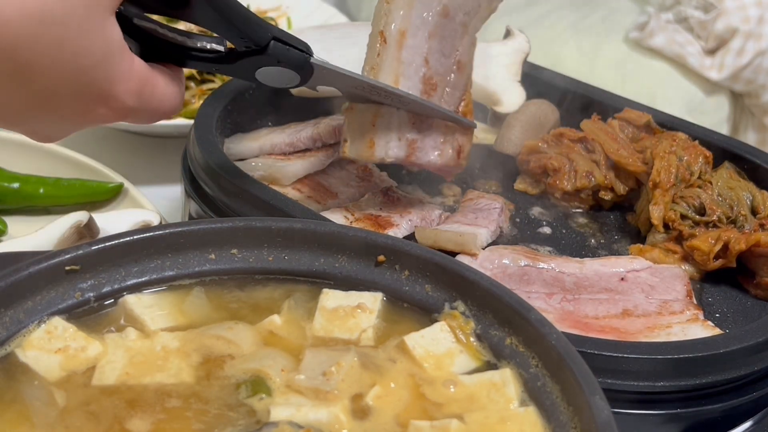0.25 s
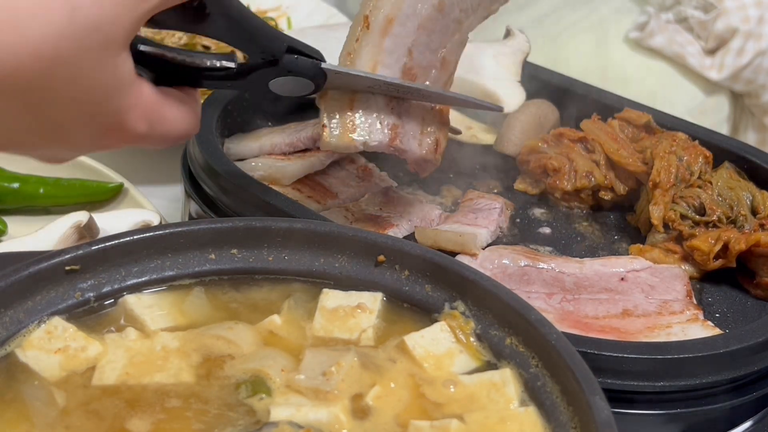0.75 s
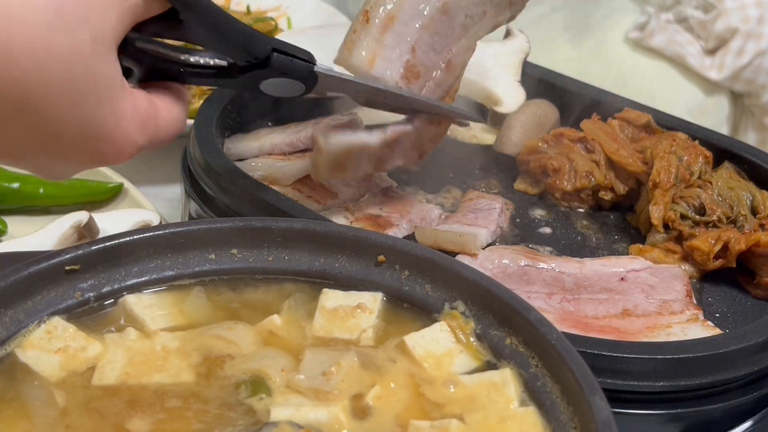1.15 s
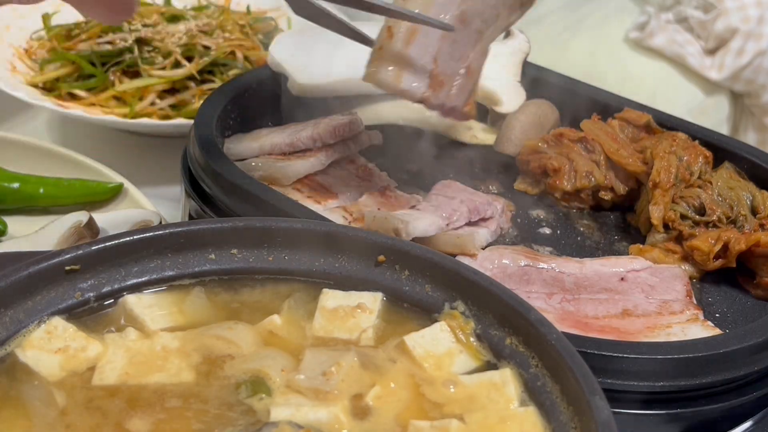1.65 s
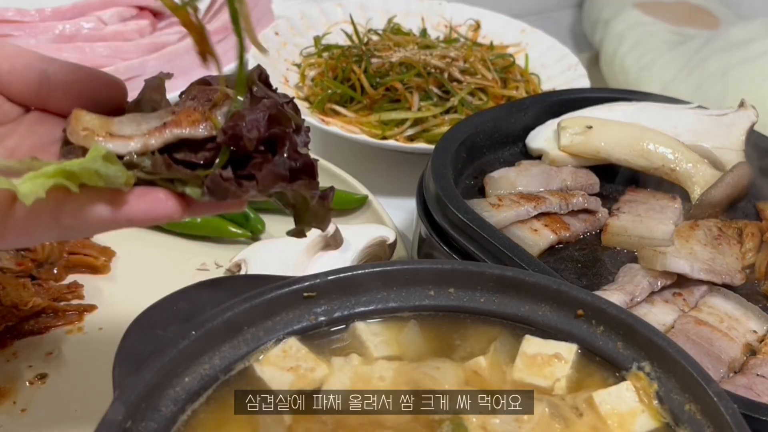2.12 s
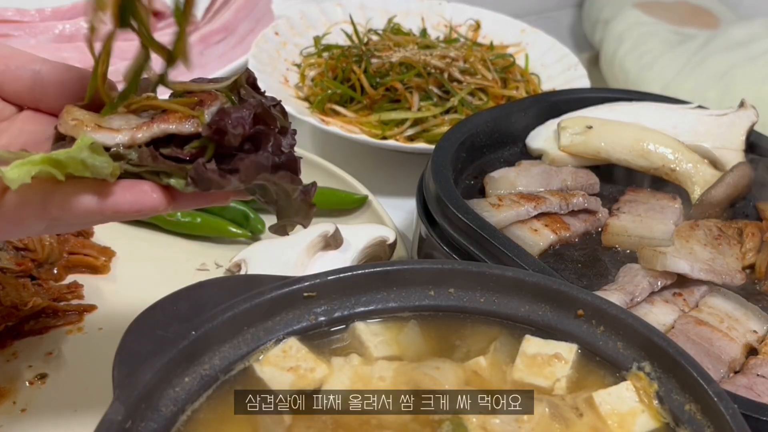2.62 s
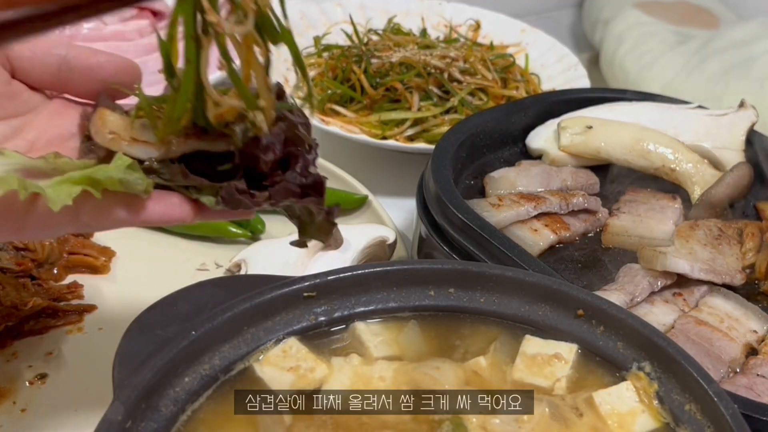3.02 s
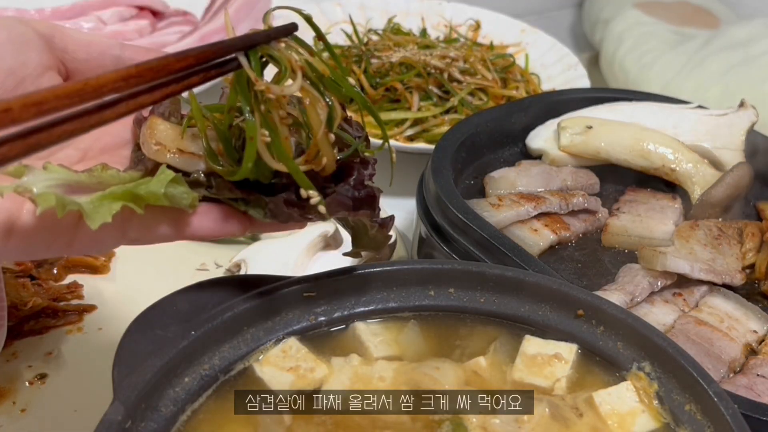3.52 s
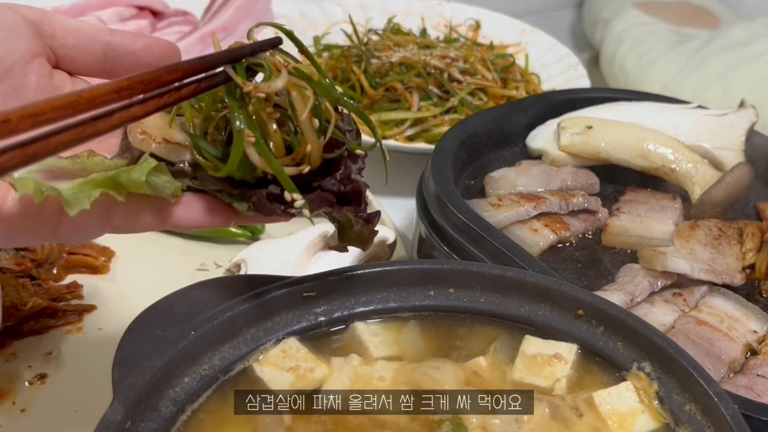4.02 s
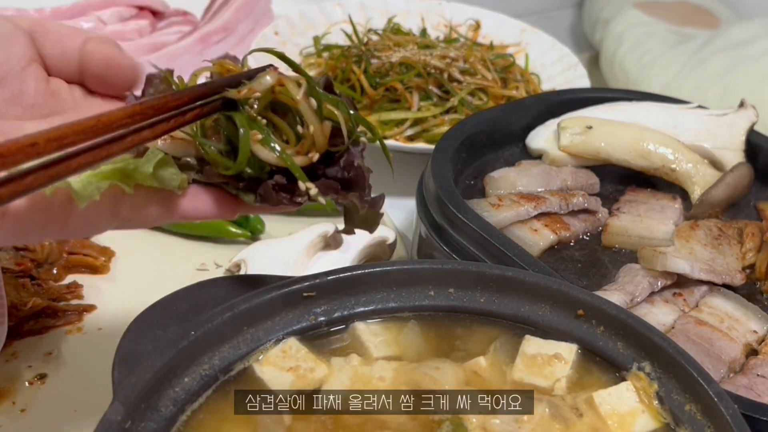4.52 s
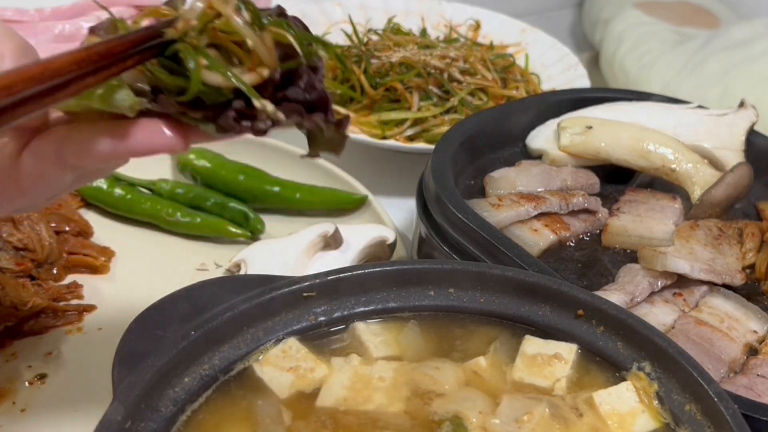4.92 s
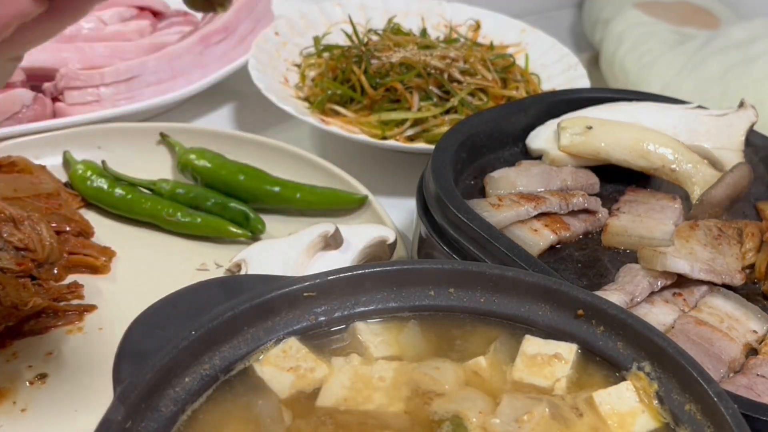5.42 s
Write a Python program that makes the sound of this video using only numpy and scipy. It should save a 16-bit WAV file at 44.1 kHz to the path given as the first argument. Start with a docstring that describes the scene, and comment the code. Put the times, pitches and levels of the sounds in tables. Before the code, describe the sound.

Pork belly sizzles close by on a tabletop grill pan, a dense bright crackle with sharp spits of fat. Scissors knock dully against the pan a few times. After almost two seconds the sizzle suddenly becomes quieter and more distant, and keeps crackling and popping with faint chopstick taps on dishes. A soft household hum and a few muffled footstep thuds lie underneath.

```python
"""At a table with a hot grill pan, pork fat sizzles, first close by and then suddenly further off.
Tiny steam bubbles burst in a dense crackle, with louder spits that pop and ring on top.
Scissors and chopsticks knock dully on the pan and dishes. The house hums softly underneath,
and soft steps thud through the floor and table."""
import sys
import numpy as np
from scipy import signal
from scipy.fft import rfft, irfft
from scipy.io import wavfile
from scipy.ndimage import uniform_filter1d

SR = 44100
rng = np.random.default_rng(int(sys.argv[2]) if len(sys.argv) > 2 else 0)


def to_wav(s):
    """Save 16-bit WAV."""
    ch = np.atleast_2d(s).T  # columns
    pcm = np.round(np.clip(ch, -1, 1) * 32767)  # PCM
    wavfile.write(sys.argv[1], SR, pcm.astype(np.int16))


N = 249606
TIME, FREQS = np.arange(N) / SR, np.fft.rfftfreq(N, 1 / SR)
FAR_FROM_S = 1.769  # when the sound jumps from close by to further off
LEFT_RIGHT = np.array([[1], [-1]])  # adds on the left, subtracts on the right


def undb(db):
    """Turn decibels into a number to multiply by."""
    return 10 ** (np.asarray(db) / 20)


def wander(per_s):
    """A smooth random wobble around zero, roughly 1 in size."""
    hold = int(SR / per_s)
    levels = np.repeat(rng.standard_normal(N // hold + 1), hold)
    return 2.8 * uniform_filter1d(uniform_filter1d(levels, hold), hold)[:N]


def unit_burst(sound):
    """Give a short sound the same energy as 2 ms (88 samples) at level 1."""
    return sound / np.sqrt(np.sum(sound ** 2, axis=-1, keepdims=True) / 88)


def colour(noise, table):
    """Make each pitch in a white noise as strong as the table says."""
    hz, db = np.transpose(table)
    gain = undb(np.interp(np.log(FREQS + 1), np.log(hz), db)) * np.sqrt(SR / 2)
    return irfft(rfft(noise) * gain, N)


def steam_bubbles(per_s, spread_db, most_db, hiss, tail_s, width_octaves, flicker_db, smooth_below_hz):
    """Each bursting bubble lets out a flash of noise around its own pitch, over a steady hiss."""
    when, size, pitch = rng.random((int(per_s * N / SR), 3)).T
    size = undb(most_db * np.tanh(-spread_db * np.log(1 - size) / most_db))  # many small, few large
    pitch = np.log2(900) + 4.3 * pitch  # up to 4.3 octaves above 900 Hz
    noise = rfft(rng.standard_normal((2, N)))
    octave = np.log2(FREQS + 1)
    flicker = undb(2 * flicker_db * (wander(30) + 0.11 * wander(57)))
    out = 0
    for centre in np.arange(7, 14.6, .5):  # half-octave bands from 128 Hz up
        band = np.cos(np.pi * np.clip(octave - centre, -.5, .5)) ** 2
        if centre == 7:  # the lowest band also takes all the bass below it
            band[octave < centre] = 1
        energy = size ** 2 * np.exp(-((pitch - centre) / width_octaves) ** 2)
        bursts = np.bincount((when * N).astype(int), energy, N)
        fade_s = tail_s * 2 ** (0.43 * (12 - centre))  # tail_s at 4096 Hz, longer lower down
        bursts = signal.lfilter([1], [1, -np.exp(-1 / (fade_s * SR))], bursts)
        # small bubbles put little into the bass, which stays a smooth hiss
        grain = (1 - hiss) / (1 + (smooth_below_hz / 2 ** centre) ** 2)
        power = 1 - grain + grain * bursts / bursts.mean() * flicker
        out = out + irfft(noise * band, N) * np.sqrt(power / power.mean())
    return out


# The tone of the sizzle, close by and further off. Each row: pitch in Hz, level in dB per Hz.
NEAR_TONE = [(150, -82.5), (500, -83), (1000, -78.5), (1550, -76.5), (1750, -70.5), (2500, -73.5),
             (3100, -69), (3800, -73), (5000, -71), (6500, -72.5), (10000, -69.5), (13000, -73.5),
             (15000, -67.5)]
FAR_TONE = [(150, -87.5), (550, -91.5), (800, -86.5), (1100, -88.5), (1500, -81), (1900, -85),
            (2900, -87.5), (3800, -85), (4600, -82.5), (5300, -85), (6300, -83.5), (11300, -86),
            (13000, -89), (15000, -85.5)]
# How hard the fat fries. Each row: time in seconds, change of level in dB.
NEAR_SWELL = [(0, 0.5), (.4, -1.76), (.7, 0.5), (1.0, -2), (1.3, 0.5), (1.55, 0.4), (1.75, -0.5)]
FAR_SWELL = [(1.8, -0.97), (2.1, -0.79), (2.4, -1.4), (2.6, -0.68), (2.8, -0.46), (3.05, -1.3), (3.3, -1.8),
             (3.55, -0.98), (3.8, -2.4), (4.05, -0.71), (4.3, -0.65), (4.45, -0.79), (4.65, -1.7),
             (4.85, -1.4), (5.0, -1.1), (5.25, -0.91), (5.34, -1.2), (5.6, -1)]


def sizzle():
    """The crackle of bubbles swells and sinks as the fat fries. Returns the near and the far sound."""
    near = steam_bubbles(per_s=1300, spread_db=5.6, most_db=23.4, hiss=0.72, tail_s=0.0007,
                         width_octaves=1.2, flicker_db=0.67, smooth_below_hz=730)
    far = steam_bubbles(per_s=650, spread_db=3.7, most_db=15.5, hiss=0.56, tail_s=0.00084,
                        width_octaves=0.41, flicker_db=1.0, smooth_below_hz=1070)
    near *= undb(np.interp(TIME, *np.transpose(NEAR_SWELL)))
    far *= undb(np.interp(TIME, *np.transpose(FAR_SWELL)))
    return colour(near, NEAR_TONE), colour(far, FAR_TONE)


# The tone of the house's hum. Each row: pitch in Hz, level in dB per Hz before any boost.
HUM_TONE = [(20, -112), (38, -112), (55, -91), (85, -81), (130, -94), (220, -100), (500, -140)]


def house_hum(boost_db):
    """The house hums softly: a deep noise that is nearly the same on both sides."""
    middle, side = colour(rng.standard_normal((2, N)), HUM_TONE) * undb(0.23 * wander(6.4))
    return undb(boost_db) * (middle + undb(-12.5) * side * LEFT_RIGHT)


def small_spit_rows(per_s=16):
    """Small spits fall at random, softer from further off. The rows are laid out like LOUD_SPITS."""
    count = int(per_s * N / SR)
    when, pitch, length = rng.random((count, 3)).T
    tilt, tick = rng.standard_normal((count, 4)).T[1:3]
    start_s = when * N / SR
    body_db = np.where(start_s < FAR_FROM_S, -52.5, -67)
    ring_hz, rise_cycles = 1615 * 2 ** (2.1 * pitch), 2.36 * (.5 + length)
    return np.transpose([start_s, body_db, 7 + 3 * tilt, body_db + 17 - tick,
                         ring_hz, body_db + 7, rise_cycles])


# Loud spits of fat. Each row: start in seconds, level of the pop's body in dB, its tilt towards the
# treble in dB per octave, tick level in dB, ring pitch in Hz, ring level in dB, ring rise in cycles.
LOUD_SPITS = [(0.0465, -49.1, 3.1, -21, 6840, -33, 1.8), (0.0727, -35, 5, -30, 3900, -27, 1.5),
              (0.1027, -41, -6, -36, 3390.0, -40, 1.1), (0.108, -50, 9.8, -35, 4600, -23, 3.6),
              (0.1252, -43, 5, -36, 4010.0, -42.2, 3.8), (0.1809, -34.5, -5, -44.4, 2820, -23, 1.6),
              (0.2243, -32.5, -2, -25.5, 2000, -29, 1.2), (0.2354, -44.7, 11.3, -45.6, 4230, -23, 1.1),
              (0.2548, -39, -6.5, -45.7, 2870.0, -27, 1.5), (0.334, -39, -2.0, -24.5, 3850.0, -52.0, 4.4),
              (0.3414, -32.5, -3.5, -35.0, 4360.0, -31, 2.4), (0.3567, -32.5, -6, -36.2, 2400, -13.5, 0.46),
              (0.3703, -28.5, -2, -38, 5140.0, -31, 1.2), (0.3902, -38, 4.4, -30, 5590.0, -38.2, 1.7),
              (0.4665, -22, -1, -20, 5360, -21, 1.4), (0.5377, -49.7, 2.5, -45.3, 3370, -25, 1.9),
              (0.5581, -41, -6, -25, 2600, -28, 1.9), (0.5955, -31.5, -3, -25, 1900.0, -31, 1.9),
              (0.6593, -44, 2, -44.7, 5140.0, -21, 1.7), (0.6694, -34, -1, -34.2, 3120.0, -31.5, 2.3),
              (0.6972, -29, -8, -26, 2610, -20, 1.7), (0.7516, -43, 3.0, -35, 2240.0, -38.3, 1.1),
              (0.7744, -37, 2.1, -42, 3870, -32, 1.0), (0.7819, -33, 4.2, -40, 2060.0, -25, 0.89),
              (0.8317, -34, 1, -30.0, 2150.0, -37.5, 1.7), (0.8891, -36, 7, -23, 5550, -25, 2.4),
              (0.8946, -31, 3, -37, 5140.0, -28, 2.4), (0.9374, -31, -5, -36, 5590.0, -27, 2.0),
              (0.9434, -48.7, 2.1, -24, 1200.0, -49, 1.3), (1.0233, -26, -4.5, -41, 3000, -18, 0.72),
              (1.0458, -42, -8, -45.9, 1900.0, -24, 1.9), (1.0571, -42.5, -8, -45.9, 1820, -29, 2.5),
              (1.0824, -30, -4, -37, 5360.0, -17, 1.2), (1.1271, -32.5, 0, -38.4, 3100, -27, 4),
              (1.1529, -33.5, -5, -30, 1980.0, -38, 1.7), (1.2336, -33, -1, -43.3, 6080.0, -24, 1.9),
              (1.2887, -28, 5, -27, 4800, -32, 1.8), (1.3032, -31, -2, -36, 3140, -25, 2.8),
              (1.3419, -38, -3, -33.4, 5140.0, -26, 1.3), (1.3624, -48, -4, -36.5, 2870.0, -18.5, 1.0),
              (1.4116, -44, 4, -34, 3390.0, -28, 1.4), (1.4261, -36, -3, -28.4, 3360, -22, 1.4),
              (1.4677, -29.5, 8, -27, 6330.0, -32.1, 1.0), (1.4784, -38, 6, -23, 4730.0, -22, 1.2),
              (1.4929, -39, 9, -33.9, 2670, -22, 1.1), (1.5315, -38, -4, -31, 3050, -28, 2.8),
              (1.5349, -29.5, -6, -23, 5250, -27, 3.9), (1.5753, -32, -1, -35, 4180.0, -32.0, 1.3),
              (1.5951, -49, -3, -44.0, 1980.0, -45, 1.7), (1.6496, -38, 6, -37.4, 3260.0, -27, 1.5),
              (1.6788, -39, 1.5, -44.3, 3390.0, -34.0, 1.5), (1.6868, -30.5, 2, -40, 2060.0, -32.1, 1.6),
              (1.712, -36, 12, -43.7, 2640.0, -43.0, 2.8), (1.8156, -45, 3.4, -43.1, 3850.0, -50.4, 2.4),
              (1.8844, -49, 3, -50, 5200, -41, 1.5), (1.9972, -47, -2, -47, 5360.0, -41.1, 1.2),
              (2.0294, -60, -2, -47.9, 6080.0, -34.9, 1.6), (2.0444, -53, 13, -44.2, 6080.0, -35.4, 1.8),
              (2.0944, -43, -7, -55, 2000, -49, 1.0), (2.0859, -40.5, 1, -34, 7000, -20, 1.6),
              (2.108, -43, 3, -40, 7180.0, -36.9, 1.8), (2.1828, -43, 12, -40, 1890, -34, 0.99),
              (2.1948, -40, 5, -32, 4570, -25, 2.6), (2.2772, -51, 9, -43, 6400, -23.5, 2.3),
              (2.394, -46.6, 2, -52, 1900.0, -43.3, 1.1), (2.4188, -46, 4, -45, 3260.0, -44.6, 1.4),
              (2.464, -59, 4, -34.5, 7180.0, -35, 1.3), (2.5385, -49, 2, -40, 3690.0, -36, 1.1),
              (2.5443, -48, 3.5, -39, 6080.0, -27, 2.2), (2.5612, -47, 9, -41, 6640, -24, 1.2),
              (2.584, -56, 3.1, -61.0, 3600, -40.3, 2.4), (2.6023, -54, 7.4, -58.8, 4630, -31, 3.3),
              (2.6276, -50, 13, -37.5, 5360.0, -32, 1.7), (2.6366, -56, 7, -36, 2640.0, -54.7, 1.2),
              (2.6543, -60.3, 7.8, -44, 6600.0, -27, 2.7), (2.6965, -55, 1.5, -37, 7180.0, -29, 1.7),
              (2.7391, -55, 6, -52.4, 4870, -32, 2.4), (2.8271, -43, -8, -35.5, 1900.0, -56, 1.1),
              (2.8606, -51, -13, -55, 2500, -45, 1.1), (2.8737, -54, 1, -37.4, 7180.0, -38, 2.7),
              (2.8847, -53, -5, -40, 2150.0, -44.7, 1.2), (2.8921, -59, 10, -56.1, 6600.0, -32, 1.7),
              (2.953, -42, -1, -34, 1820.0, -44.1, 1.0), (3.031, -42, 0, -51, 4360.0, -52.6, 4.2),
              (3.0393, -46, -11, -61.4, 2640.0, -52.0, 1.7), (3.0615, -47, 7.7, -48, 5590.0, -48.1, 2.0),
              (3.0953, -43, 9, -57, 2820, -44, 1.2), (3.1048, -47, 12.5, -55, 4010.0, -43.0, 1.4),
              (3.1534, -52, 12.0, -50, 4540.0, -38, 1.3), (3.1607, -43, 3, -56.6, 6250, -29, 2),
              (3.2673, -52, 8, -47, 7180.0, -30, 1.3), (3.4405, -42.5, 2, -54, 2870.0, -46, 1.4),
              (3.4624, -52.6, 7.0, -40, 6600.0, -34, 2.5), (3.4964, -40, 7, -36, 7300, -23, 1.7),
              (3.5133, -37.5, 5, -55.7, 6040, -28, 2.3), (3.5823, -41.5, 5, -34, 1820.0, -38, 1.4),
              (3.6052, -48, 1, -37, 6880.0, -34.2, 1.8), (3.6413, -50, -8, -44.9, 7180.0, -42, 1.3),
              (3.6704, -56.7, -4.7, -40, 6600.0, -45, 1.7), (3.7225, -52.6, -2, -45, 6880.0, -39, 1.8),
              (3.7516, -46, -5, -53, 4010.0, -40, 1.0), (3.786, -49, 1.8, -53.6, 5600, -34, 5.1),
              (3.8317, -54, 2.3, -63.1, 5360.0, -44, 3.1), (3.8831, -47.5, 14, -62.2, 1980.0, -42, 2.5),
              (3.9158, -55, 4.7, -45.3, 6500, -27, 3.3), (3.9203, -40, -4, -42, 7400, -16, 1.05),
              (3.9695, -52, 4, -43.0, 2060.0, -39, 1.7), (3.9805, -58, 4.8, -44, 4930.0, -35, 3.3),
              (4.0336, -58.7, 11.7, -40, 7180.0, -32, 1.4), (4.0451, -49, 5.4, -36, 3690.0, -41, 4.5),
              (4.0635, -42, 1, -52.0, 3850.0, -36, 3.5), (4.0807, -41, 0, -39, 2330.0, -52.6, 1.2),
              (4.1373, -56, 18, -36, 3120.0, -49, 3.0), (4.1943, -49, 0, -37, 2870.0, -59.9, 3.0),
              (4.2155, -52, 5.2, -42, 7180.0, -46, 3.3), (4.2353, -41, 4, -61.2, 4540.0, -42, 4.3),
              (4.2581, -42, 7, -42.4, 6500, -26, 1.7), (4.2735, -52, 12, -44.9, 3020, -34, 1.4),
              (4.2954, -39, 4, -37, 3540.0, -41.9, 1.6), (4.3621, -50, -3, -60.1, 1360.0, -34, 1.2),
              (4.3702, -57, 12.0, -34, 6270, -28, 2.1), (4.4007, -45, 4, -35.5, 2060.0, -35, 1.1),
              (4.4607, -52, 3.8, -53, 5550, -27, 2.2), (4.4788, -41, -2, -47, 3690.0, -45, 2.2),
              (4.5569, -46.4, 10, -36, 5860, -39, 2.0), (4.5989, -45, 3, -37, 4540.0, -34, 1.1),
              (4.6739, -52, -2, -49, 4730.0, -44, 1.6), (4.7118, -38, -2, -31, 7000, -30, 1.2),
              (4.719, -52.7, 7.3, -40, 1820.0, -47, 1.6), (4.7521, -50, 7.2, -39.5, 4930.0, -39, 2.4),
              (4.7778, -45.4, 0.8, -39, 6880.0, -34, 1.0), (4.8048, -42, 3, -59.1, 2540.0, -49.2, 1.3),
              (4.8137, -44, 2.5, -34.5, 6330.0, -36, 1.1), (4.9066, -56, 5, -39, 5830.0, -36.2, 1.5),
              (4.933, -42, 6, -39, 3690.0, -26, 1.1), (4.9393, -53, 6.2, -60.7, 6080.0, -26, 2.7),
              (4.9713, -44, 1, -36, 2150.0, -33, 0.89), (5.0701, -47, 4.6, -59.4, 4730.0, -32, 2.8),
              (5.0988, -41.5, 0, -36, 6880.0, -27, 1.3), (5.1325, -42, 3, -33, 6600.0, -27, 1.3),
              (5.173, -41, -4, -36, 2430.0, -47, 1.4), (5.2208, -56, 10, -41, 6400, -30, 2.9),
              (5.2528, -58, -3, -49, 4930.0, -43.4, 4.2), (5.2658, -52, 3.4, -48.6, 5440, -24.5, 2.7),
              (5.2783, -41, -1, -42, 6330.0, -41, 2.4), (5.2922, -47, 11, -53.5, 4200, -32, 1.5),
              (5.3887, -62, 9.2, -46, 5330, -26, 1.7), (5.4071, -60, 12.0, -51.4, 5590.0, -32, 2.4),
              (5.4233, -50, -5, -43, 1700, -35, 1.1), (5.4298, -50, -7.0, -61.5, 1890, -37, 1.1),
              (5.4672, -58.6, 12.0, -39.9, 7180.0, -33.7, 1.3), (5.4874, -40.5, 5, -38, 4540.0, -42, 1.6),
              (5.549, -44, 6, -49.2, 4900, -23, 1.4), (5.5802, -51.3, 7.5, -48.0, 4700, -30, 1.8),
              (5.5867, -43, 4, -54.3, 4400, -36.2, 1.7), (5.6054, -43, -3, -53.5, 2730, -39, 1.4),
              (5.6294, -45, 3, -40, 1750, -36, 0.86), (5.6434, -43, -1, -52, 5230, -38, 1.3)]
# Droplets too small to have a body or a ring. Each row: start in seconds, tick level in dB.
DROPLET_TICKS = [(1.9112, -47), (1.9166, -47), (2.0206, -43), (2.0964, -41), (2.1248, -40), (2.2565, -39),
                 (2.2853, -42), (2.6672, -44), (2.7195, -44), (2.7486, -48), (2.8209, -43), (2.9755, -43),
                 (2.9944, -44), (3.0162, -46), (3.4894, -41), (3.5165, -40), (3.5514, -43), (3.562, -40),
                 (3.6133, -39), (4.0601, -40), (4.3161, -43), (4.3307, -45), (4.3357, -43), (4.5157, -44),
                 (4.6366, -43), (4.742, -36), (4.894, -42), (4.9556, -41), (4.9929, -44), (5.084, -37),
                 (5.1384, -39), (5.2035, -37.5), (5.342, -42), (5.386, -40), (5.3919, -43), (5.4918, -45),
                 (5.643, -41)]
# The four parts of a pop: puff, crack and snap form its body, and the tick sits on top.
# Each row: lowest pitch in Hz, highest pitch in Hz, rise time in seconds.
POP_BANDS = [(234, 1640, 0.001), (1160, 3800, 0.00052), (4000, 5570, 0.00034), (7040, 13200, 0.00018)]


def spits(body_hz=2860, tail_s=0.0062, silent_db=-90):
    """Each spit is a sharp pop with a spray of noise, and a bubble that rings for a few cycles."""
    out, t = np.zeros((2, N + 1024)), np.arange(1024) / SR
    ticks = [(start_s, silent_db, 0, db, body_hz, silent_db, 1) for start_s, db in DROPLET_TICKS]
    rows = [*LOUD_SPITS, *ticks, *small_spit_rows()]
    start_s, body_db, tilt_db, tick_db, ring_hz, ring_db, rise_cycles = np.transpose(rows)[:, :, None]
    noise = rng.standard_normal((len(rows), 2, len(t))).swapaxes(0, 1)
    sound = np.zeros_like(noise)
    push = np.sign(noise[0, :, :1])  # a pop starts as pressure or as suction
    age = t * ring_hz / np.maximum(rise_cycles, .5)  # counted in rise times
    fade = 2.27  # the ring fades this many times slower than it rises
    glide = 1 + .012 * (age / fade - 1)  # the pitch rises a little as the bubble closes
    ragged = 1 + .6 * uniform_filter1d(noise[1], size=9)
    ring_shape = (1 - np.exp(-age)) * np.exp((1 - age) / fade)
    sound[0] = undb(ring_db) * np.sin(2 * np.pi * ring_hz * t * glide) * ragged * ring_shape
    for k, (low_hz, high_hz, rise_s) in enumerate(POP_BANDS):
        band = signal.butter(2, [low_hz, high_hz], "band", fs=SR, output="sos")
        octave = np.log2(np.sqrt(low_hz * high_hz) / body_hz)
        # the body falls away on both sides of body_hz; the puff gets 1.5 dB back
        band_db = body_db + tilt_db * octave - 5.5 * octave ** 2 + 1.5 * (k == 0)
        spray = t / rise_s * np.exp(1 - t / rise_s)
        # a brief echo or ring of the pan trails each pop, weaker in each higher band
        tail = undb(6 - 5.5 * k) * np.exp(-t / tail_s) * (t > rise_s)
        burst = unit_burst(signal.sosfilt(band, noise * (spray + tail)))
        # every other band is flipped so that they join without a hollow
        pop = push * (-1) ** k * unit_burst(signal.sosfilt(band, 1. * (t == 0)))
        burst[0] = unit_burst(pop + undb(-1.5) * burst[0])
        sound += undb(tick_db if k == len(POP_BANDS) - 1 else band_db) * burst
    for k, start in enumerate((start_s[:, 0] * SR).astype(int)):
        out[:, start:start + len(t)] += sound[:, k]
    return out[:, :N]


# Knocks and scrapes of scissors and chopsticks. Each row: start in seconds, level in dB,
# length of the touch in seconds, tilt towards the treble in dB per octave.
UTENSIL_KNOCKS = [(0.0731, -30.5, .0003, -2), (0.32, -40, .0003, 1), (0.6974, -28.5, 0.00068, 2),
                  (0.89, -35.5, 0.0015, -6), (1.5319, -30, 0.0054, 1.5), (1.7598, -38.5, .0006, 0),
                  (2.0858, -42, 0.0011, 0), (3.0385, -45, 0.00085, 2), (3.4966, -47, .001, 0),
                  (3.7239, -42, 0.0088, 5), (3.92, -40, 0.00027, 9), (4.33, -49, 0.0011, -2),
                  (4.6605, -47, .001, 2), (5.0283, -45, .001, 0)]
# The notes of pan and dishes. Each row: pitch in Hz, relative level in dB, seconds to fade by 60 dB.
DISH_NOTES = [(298, -16.5, 0.078), (460, -7.5, 0.026), (780, -7.5, 0.035), (1250, 6.5, 0.019),
              (1630, 8, .008)]


def knocks():
    """A blow, or a short rough scrape, rings the low notes of the pan and dishes."""
    out, t = np.zeros((2, N + 2048)), np.arange(2048) / SR
    hz, note_db, fade_s = np.transpose(DISH_NOTES)[:, :, None]
    for start_s, db, touch_s, tilt_db in UTENSIL_KNOCKS:
        # each knock lands somewhere else, which shifts the notes
        shifted_hz = hz * (1 + 0.023 * rng.standard_normal(hz.shape))
        strength = undb(note_db + tilt_db * np.log2(hz / 800))
        ring = np.sum(strength * np.sin(2 * np.pi * shifted_hz * t) * undb(-60 * t / fade_s), axis=0)
        contact = rng.standard_normal((2, 1024)) * np.exp(-(t[:1024] / touch_s) ** 2)
        contact[:, 0] = 5.5  # the first touch is harder than the roughness that follows
        knock = signal.fftconvolve(contact, ring[None], axes=1)[:, :len(t)]
        start = int(start_s * SR)
        out[:, start:start + len(t)] += undb(db) * unit_burst(knock)
    return out[:, :N]


# Soft steps. Each row: start in seconds, then a level in dB for each of the four floor notes.
FOOTSTEPS = [(0.47, -51, -55, -66, -68), (0.76, -47.5, -54, -61, -70), (0.98, -52, -59, -68, -72),
             (1.37, -42, -36.5, -46, -51), (1.51, -48, -49.5, -53, -69), (1.67, -58, -49.5, -63.5, -64),
             (3.674, -48.5, -45.5, -52, -58), (3.8, -66, -59, -67, -59), (4.912, -43.5, -46, -52, -51.5),
             (5.09, -51.5, -55, -63, -74), (5.43, -60, -66, -63, -63)]
# The notes of floor and table; lower ones peak later.
# Each row: pitch in Hz, seconds to reach the peak, steepness of the rise and fall.
FLOOR_NOTES = [(55.2, 0.091, 2.2), (84.5, 0.074, 4.4), (109.7, 0.032, 1), (151, 0.017, 1.05)]


def footsteps(near):
    """Each near (or far) step swells and fades, unevenly, in the low notes of floor and table."""
    out = np.zeros(N)
    wobbles = [(undb(wander(17)), 0.59 * wander(17)) for _ in FLOOR_NOTES]
    for start_s, *levels_db in FOOTSTEPS:
        if (start_s < FAR_FROM_S) != near:
            continue
        age = np.maximum(TIME - start_s, 0)
        for (hz, peak_s, steepness), db, (gain, drift) in zip(FLOOR_NOTES, levels_db, wobbles):
            shape = (age / peak_s * np.exp(1 - age / peak_s)) ** steepness
            out += undb(db) * gain * shape * np.sin(2 * np.pi * hz * age + drift)
    return out


# How the pan's sound reaches two microphones, most treble arriving at the right one first. Each row:
# pitch in Hz, how alike the sides are from 0 to 1, left minus right in dB, right's lead in radians.
NEAR_STEREO = [(150, .97, .3, 0), (500, .87, 1, 0), (1000, .8, 2.5, 0), (1500, .3, -2.5, 0),
               (1900, .92, -3, 0), (2500, .99, 0, 0), (4900, 1, 0, 0), (6200, .8, 0, .95),
               (7200, .82, 0, 1.75), (8100, 1, 0, 3.1), (8900, 1, 0, 3.2), (10000, .85, 0, 4.65),
               (11200, 1, 0, 6.2), (12500, 1, 0, 6.35), (13300, .82, 0, 7.3), (15300, .95, 0, 9.4)]
FAR_STEREO = [(150, .92, .4, 0), (300, .75, .8, 0), (800, .32, 1.9, 0), (1150, .75, 0, 0),
              (1500, .55, 3, .9), (1850, .99, .3, 0), (2600, .95, 0, 0), (3300, .68, -1, -.55),
              (4600, .77, 1, -.66), (5300, .36, 1.3, .7), (6300, .66, -1, 1.2), (7400, .8, 0, 1.95),
              (8100, .98, 0, 3.1), (8800, .98, 0, 3.2), (10000, .8, 0, 4.65), (11200, .99, 0, 6.2),
              (12300, .99, 0, 6.35), (13200, .75, 0, 7.1), (15300, .93, 0, 9.4)]


def stereo(pair, table):
    """Make left and right from a pair of sounds: one that both sides share, one that sets them apart."""
    hz, *columns = np.transpose(table)
    alike, balance_db, lead = (np.interp(FREQS, hz, column) for column in columns)
    shared, apart = rfft(pair)
    mix = np.sqrt((1 + alike) / 2) * shared + LEFT_RIGHT * np.sqrt((1 - alike) / 2) * apart
    return irfft(mix * np.exp(-.5j * LEFT_RIGHT * lead) * undb(LEFT_RIGHT * balance_db / 2), N)


def scene():
    """The pan, the house and the steps, heard close by and then from further off."""
    spits_and_knocks = spits() + knocks()
    near_sizzle, far_sizzle = sizzle()
    near_pan = stereo(near_sizzle + spits_and_knocks, NEAR_STEREO)
    far_pan = stereo(far_sizzle + spits_and_knocks, FAR_STEREO)
    near = near_pan + house_hum(boost_db=5.5) + footsteps(near=True)
    far = far_pan + house_hum(boost_db=0) + footsteps(near=False)
    return np.where(TIME < FAR_FROM_S, near, far)


def record(dry):
    """The very highest treble, above 15700 Hz, is cut away."""
    return signal.sosfilt(signal.ellip(10, .2, 70, 15700, fs=SR, output="sos"), dry)


dry = scene()
out = record(dry)
to_wav(out)
```